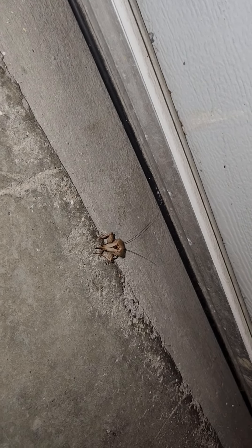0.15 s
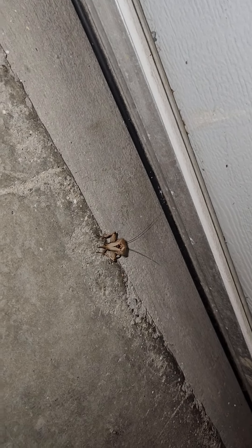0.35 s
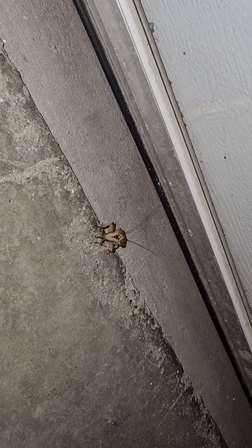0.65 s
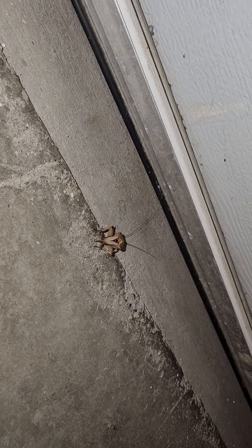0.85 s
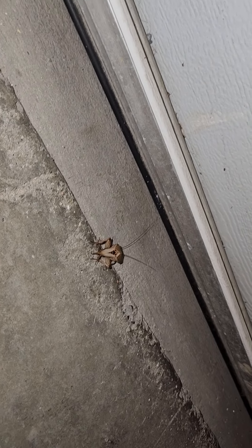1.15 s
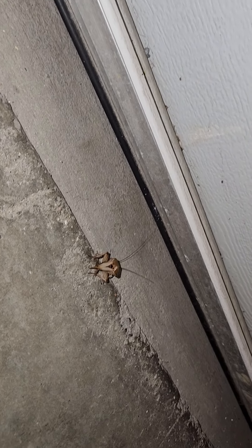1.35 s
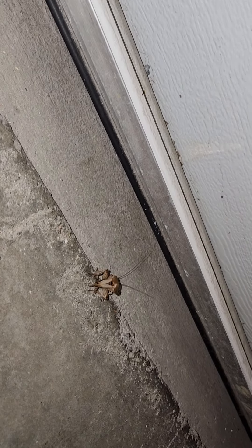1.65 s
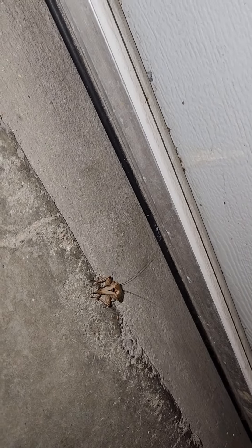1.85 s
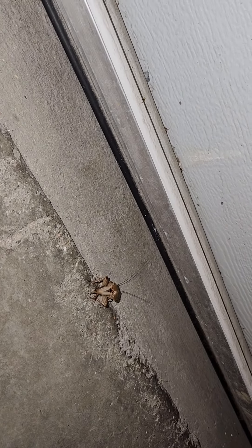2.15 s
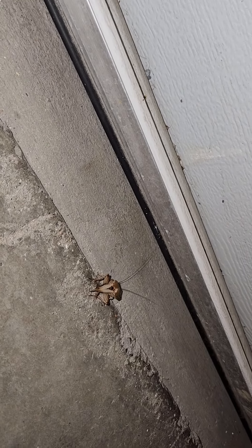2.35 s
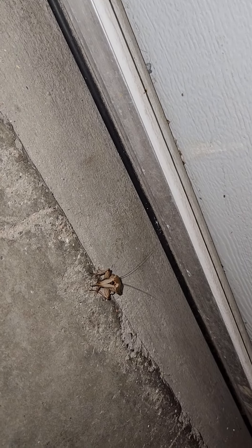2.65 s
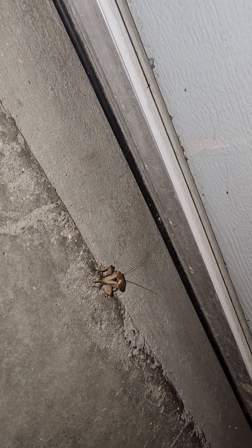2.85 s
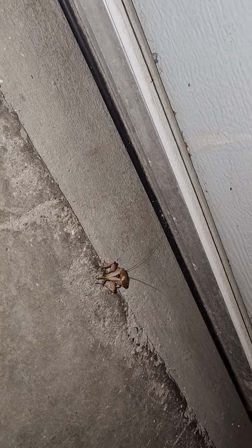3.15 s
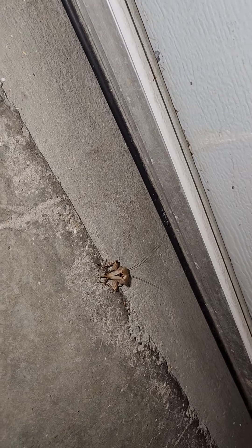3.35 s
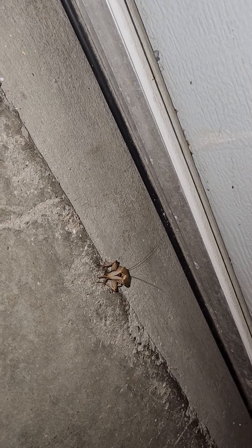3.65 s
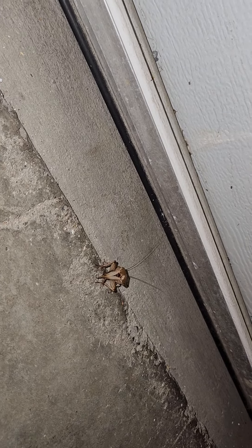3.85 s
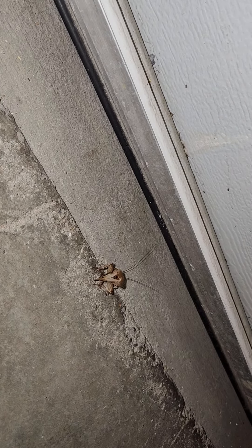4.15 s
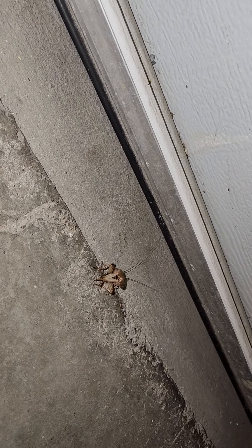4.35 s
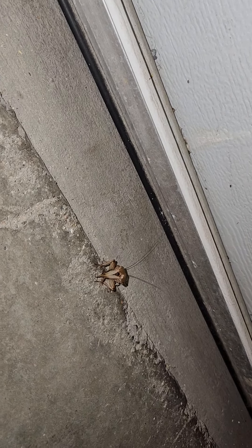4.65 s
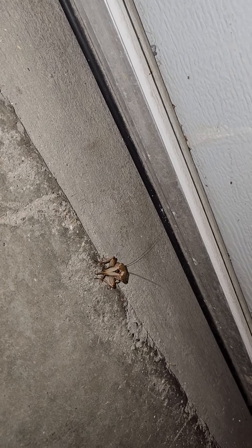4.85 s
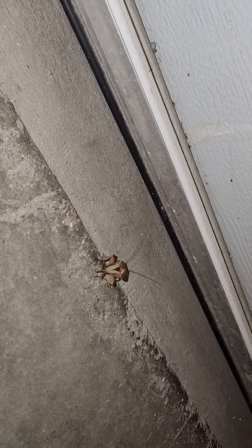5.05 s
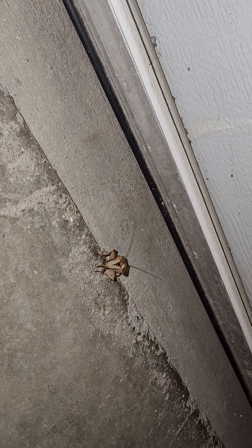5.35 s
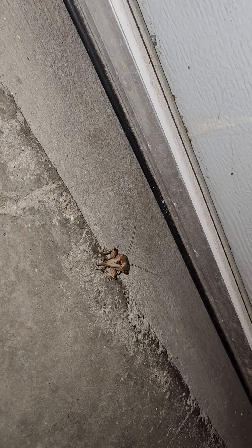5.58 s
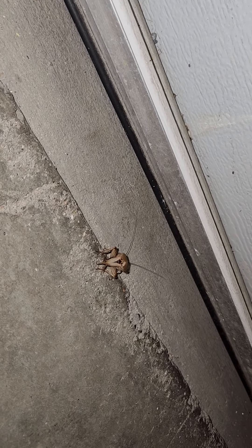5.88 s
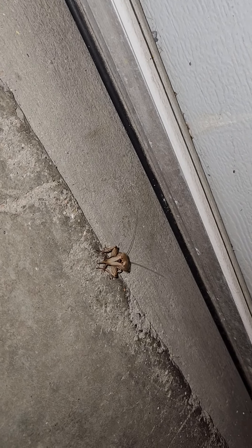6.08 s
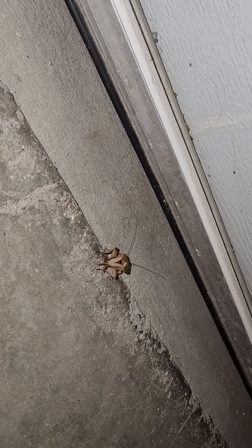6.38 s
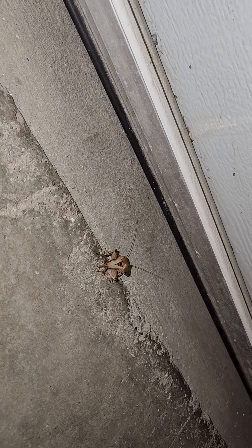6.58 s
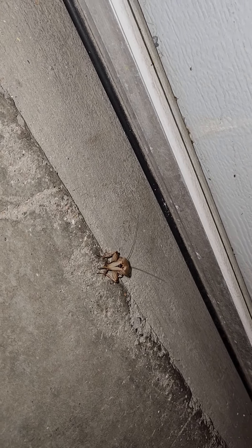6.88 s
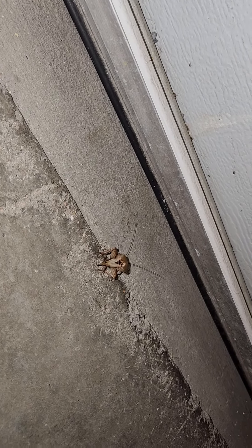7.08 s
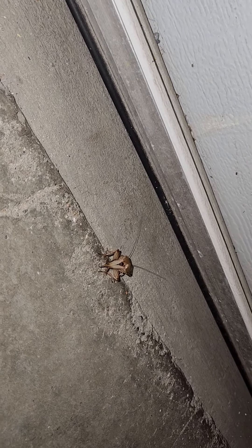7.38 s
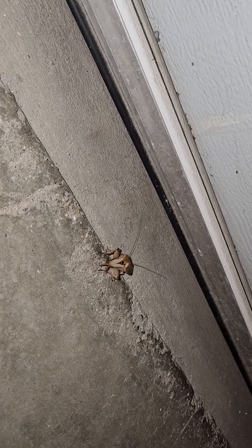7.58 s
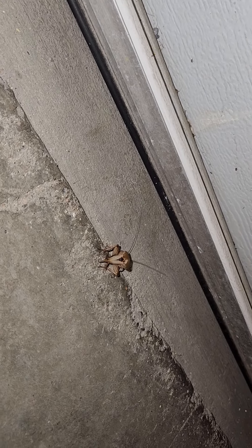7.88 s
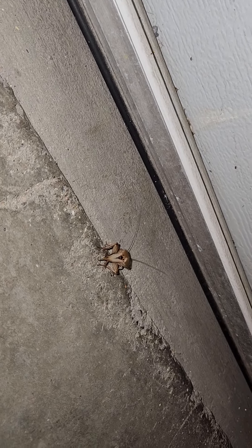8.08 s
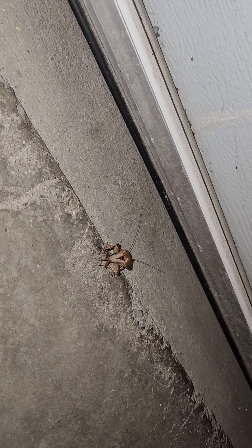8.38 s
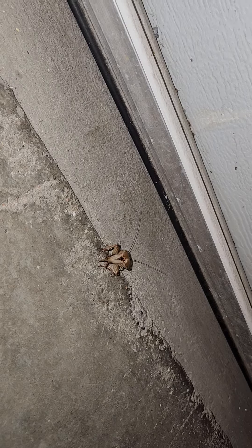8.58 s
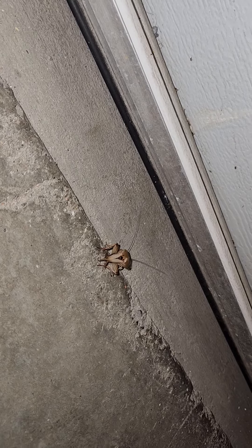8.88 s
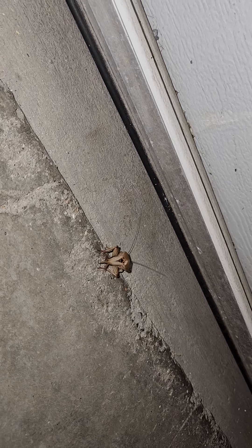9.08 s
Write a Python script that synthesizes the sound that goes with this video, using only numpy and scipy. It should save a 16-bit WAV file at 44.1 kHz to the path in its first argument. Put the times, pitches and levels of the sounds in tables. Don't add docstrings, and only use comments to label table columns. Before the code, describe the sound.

One cricket sings very close to a hand-held stereo microphone in a bare, hard room. Short, piercing, high chirps, each a rapid trill of a few wing strokes, repeat about five times a second. A slightly longer gap comes after two seconds, then the steady rhythm resumes to the end. Each chirp leaves a brief bright ring, over very quiet gusting ventilation rumble and faint hums.

```python
import sys
import numpy as np
from scipy import signal
from scipy.fft import rfft, irfft, next_fast_len
from scipy.io import wavfile
from scipy.ndimage import uniform_filter1d

SR = 44100
rng = np.random.default_rng(int(sys.argv[2]) if len(sys.argv) > 2 else 0)


def voltage_ratio(level):
    return 10 ** (np.asarray(level, float) / 20)


def unload_wav(signal):
    wavfile.write(
        sys.argv[1],
        SR,
        np.round(np.clip(np.atleast_2d(signal).T, -1, 1) * 32767).astype(np.int16),
    )


N = 407043

LEAD_IN = 8820
FRAME = 1024


def at_hz(points, hz):
    table_hz, value = np.array(points)[:, :2].T
    return np.interp(np.log(hz + 1), np.log(table_hz), value)


def in_time(rows, t):
    s, *columns = np.transpose(rows)
    return [np.interp(t, s, column) for column in columns]


def rms_one(x):
    return x / np.sqrt(np.mean(x ** 2) + 1e-20)


def resonance(x, hz, width_hz):
    r = np.exp(-np.pi * width_hz / SR)
    feedback = [1, -2 * r * np.cos(2 * np.pi * hz / SR), r * r]
    return signal.lfilter([(1 - r * r) / 2, 0, (r * r - 1) / 2], feedback, x)


def stereo_noise(spectrum):
    # f/Hz, correlation
    likeness = [(60, 0.99), (180, 0.98), (550, 0.32), (1650, -0.83), (4970, -0.36), (15000, 0.03)]
    # f/Hz, level/dB
    balance = [(60, -0.3), (380, 3), (700, -0.5), (1300, -3.5), (2400, 3)]
    size = next_fast_len(N)
    hz = np.fft.rfftfreq(size, 1 / SR)
    mid, side = rfft(rng.standard_normal((2, size))) * voltage_ratio(at_hz(spectrum, hz))
    alike = np.clip(at_hz(likeness, hz), 0, 1)
    pair = np.sqrt(1 + alike) * mid + np.sqrt(1 - alike) * side * [[1], [-1]]
    tilt = voltage_ratio(at_hz(balance, hz) / 2 * [[1], [-1]])
    return rms_one(irfft(pair * tilt, size)[:, :N])


def ventilation():
    # t/s, level/dB
    gusts = [(0.0, -48), (0.28, -44.5), (1.0, -49), (1.16, -43.5), (1.44, -48), (1.82, -38), (2.88, -45.5),
             (3.01, -41.5), (3.65, -52), (3.67, -43), (5.14, -49.5), (5.4, -40.5), (6.71, -47.5),
             (6.81, -40), (7.22, -47), (7.48, -43.5), (8.87, -49.5), (9.23, -39)]
    # f/Hz, density/dB per Hz
    lows = [(12, -48), (20, -10), (32, -14.5), (81, 1.5), (103, 3.5), (160, -18.5), (210, -59), (350, -120)]
    # f/Hz, density/dB per Hz
    air = [(76, -22), (130, 0.5), (194, -8), (282, -8.5), (325, -9), (638, -20), (1100, -29.5), (1490, -27),
           (2160, -44.5), (3320, -44), (4000, -59), (5200, -60.5), (8800, -120)]
    # f/Hz, width/Hz, level/dB
    hums = [(90.06, 6.8, -55), (214.5, 7.2, -64), (271, 8.3, -54.5), (288.1, 7.8, -56.5), (359.5, 5.9, -61),
            (473, 12.5, -72), (624, 5.2, -82), (1480, 6.6, -76), (1960, 34, -86.5), (3590, 8.9, -83)]
    t = np.arange(N) / SR
    rumble = voltage_ratio(in_time(gusts, t)[0]) * stereo_noise(lows)
    out = rumble + voltage_ratio(-49.5) * stereo_noise(air)
    for hz, width_hz, level_db in hums:
        wobble = rms_one(resonance(resonance(rng.standard_normal(N), hz, width_hz), hz, width_hz))
        steady = 2.5 * np.sin(2 * np.pi * hz * t) * (hz > 1000) * (width_hz < 30)
        out = out + voltage_ratio(level_db) * rms_one(wobble + steady)
    return out


def squeak():
    # t/s, f/Hz, level/dB
    glide = [
        (1.08, 1860, -85),
        (1.13, 1846, -65),
        (1.27, 1740, -65),
        (1.3, 1893, -65),
        (1.38, 1790, -66),
        (1.45, 1800, -90),
    ]
    hz, level_db = in_time(glide, np.arange(N) / SR)
    grain = 1 + .7 * rms_one(uniform_filter1d(rng.standard_normal((2, N)), size=250))
    tone = np.sin(2 * np.pi * np.cumsum(hz) / SR)
    return voltage_ratio(level_db) * grain * tone * (level_db > -89)


def room(x):
    # delay/ms, level/dB
    echoes = [(8.5, -14), (16, -33.5), (27, -27.5)]
    # f/Hz, t60/s, level/dB
    decay = [(1000, 0.5, 3.5), (5400, 0.95, -0.5), (7700, 0.99, -11), (10760, 0.22, 7.5), (16000, 0.3, 9.5)]
    # f/Hz, width/Hz, t60/s, level/dB
    door_frame = (10480, 290, 0.63, 4.3)
    # f/Hz, width/Hz, level/dB
    favoured = (6270, 680, 0.55)
    t = np.arange(SR) / SR
    edges = np.geomspace(700, 18000, num=10)
    hz, t60, level_db = np.transpose(decay)
    tail = 0
    for low, high in zip(edges, edges[1:]):
        band_pass = signal.butter(2, [low, high], "band", fs=SR, output="sos")
        band = signal.sosfilt(band_pass, rng.standard_normal((2, SR)))
        centre = np.sqrt(low * high)
        fade_db = np.interp(centre, hz, level_db) - 60 * t / np.interp(centre, hz, t60)
        tail = tail + band * voltage_ratio(fade_db)
    frame_hz, frame_width_hz, frame_t60, frame_db = door_frame
    ringing = resonance(rng.standard_normal((2, SR)), frame_hz, frame_width_hz)
    tail = tail + ringing * voltage_ratio(frame_db - 60 * t / frame_t60)
    colour_hz, colour_width_hz, colour_db = favoured
    tail = tail + voltage_ratio(colour_db) * resonance(tail, colour_hz, colour_width_hz)
    build_up = np.clip(t / 0.0039, 0, 1)
    tail = voltage_ratio(-14.5) * rms_one(tail * build_up) / np.sqrt(SR)
    for ms, echo_db in echoes:
        delay = round(ms * SR / 1000)
        tail[[0, 1], [delay + 5, delay]] += voltage_ratio(echo_db)
    return signal.fftconvolve(x, tail, axes=1)[:, :x.shape[1]]


def scrape(length_ms, treble_db, t):
    # f/Hz, density/dB per Hz
    scrape_colour = [(900, -21), (2200, -24), (3600, -19), (4600, 3.5), (5900, 5.5), (7400, 3), (8300, -4),
                     (9400, -15.5), (10600, -6.5), (13000, -13), (15600, -6), (17000, -28)]
    hz = np.fft.rfftfreq(FRAME, 1 / SR)
    patches = rms_one(uniform_filter1d(rng.standard_normal((len(length_ms), len(hz))), size=30))
    colour = voltage_ratio(at_hz(scrape_colour, hz) + 2.5 * patches + treble_db * (hz > 9500))
    noise = rfft(rng.standard_normal((3, len(length_ms), FRAME)))
    shared, left, right = rms_one(irfft(noise * colour, FRAME))
    rise = np.clip((t + .0025) / .0035, 0, 1) ** 1.3
    rub = rise * np.exp(-np.maximum(t - 1e-3 * length_ms, 0) / .0028)
    mics_differ = .6
    return rub * (shared + mics_differ * left), rub * (shared + mics_differ * right)


def wing_tone(length_ms, rough, t):
    # multiple of the wing pitch, level/dB
    overtones = [(2, -40), (3, -32.5)]
    wing_hz, wing_width_hz = 5232, 480
    spread_hz, glide_hz, regrip_drop_hz = 25, 267, 137
    chance = rng.standard_normal((len(rough), 5))
    closing = np.clip((t + 0.0011) / (0.00093 * length_ms + 0.00016), 0, 1)
    push = np.sin(np.pi * closing ** (1 - 0.047 * rough)) ** 0.28
    tooth_hz = wing_hz + spread_hz * chance[:, :1] + glide_hz * (.12 - closing ** 3.1)
    waver = 0.69 * rough * signal.lfilter([.03], [1, -.97], rng.standard_normal(closing.shape))
    phase = 2 * np.pi * np.cumsum(tooth_hz, axis=1) / SR + waver + 9 * chance[:, 3:4]
    late = np.clip((t - 1e-3 * length_ms * (1.04 + 0.072 * chance[:, 2:3])) / 0.0029, 0, 1)
    regrip = rough * voltage_ratio(-10 + 3.0 * chance[:, 4:]) * np.sin(np.pi * late ** .7) ** 2
    regrip_phase = 2 * np.pi * (wing_hz - regrip_drop_hz) * t + waver + 9 * chance[:, 1:2]
    drive = push * np.sin(phase) + regrip * np.sin(regrip_phase)
    tone = resonance(resonance(drive, wing_hz, wing_width_hz), wing_hz, 1650)
    tone = tone / np.abs(tone).max(axis=1, keepdims=True)
    for multiple, level_db in overtones:
        level = voltage_ratio(level_db + 2.8 * rng.standard_normal(rough.shape))
        tone = tone + level * push ** 3.2 * np.sin(multiple * phase)
    return tone


def chirp(start, span_ms, level_db, swell_db, false_db):
    # time ahead/s, peak/dB, length/ms
    setting = (0.014, -41.5, 2.7)
    # time ahead/ms, length when faint/ms, length when it catches/ms
    false_start = (7.6, 1.7, 3.1)
    stroke_ms = 11
    slowing, timing_ms = .06, .35
    swell_strokes = 2.8
    opening_ms, later_ms, length_spread = 6.07, 3.9, 0.23
    short_is_loud_db, peak_spread_db = 0.61, 1.62
    loudest_db = -2.8
    chance = rng.standard_normal((3, 6))
    k = np.arange(round(span_ms / stroke_ms) + 1)
    short, loud, late = (chance[:, k] - chance[:, k[1:]].mean(axis=1, keepdims=True)) * (k > 0)
    swell = 1 - np.exp(-k / swell_strokes)
    place = k * (1 + slowing * k / 2)
    s = start + 1e-3 * (span_ms * place / place[-1] + timing_ms * late * (k < k[-1]))
    peak_db = level_db + swell_db * swell / swell[1:].mean()
    peak_db = peak_db + short_is_loud_db * short + peak_spread_db * loud
    peak_db = np.minimum(peak_db, loudest_db)
    length_ms = np.where(k > 0, later_ms * np.exp(-length_spread * short), opening_ms)
    strokes = np.transpose([s, peak_db, length_ms, np.where(k > 0, 1, .15)])
    ahead, tick_db, tick_ms = setting
    tick = (start - ahead, tick_db, tick_ms, 1)
    ahead_ms, faint_ms, caught_ms = false_start
    false_length_ms, false_rough = (caught_ms, .15) if false_db > -15 else (faint_ms, 1)
    failed = (start - ahead_ms / 1000, false_db, false_length_ms, false_rough)
    return np.vstack([tick, failed, strokes])


def cricket():
    # t/s, left lead/us, left minus right/dB, scrape treble above 9.5 kHz/dB
    bearing = [(.2, 71, -4.4, 3.5), (.75, 85, -4.4, 4.5), (1.26, 66, -3.6, 4), (2.1, 33, -3.5, 5),
               (2.7, 40, -3.5, 1), (3.7, 55, -3.7, 1.5), (4.4, 49, -3.6, 1.5), (6.1, 60, -3.8, .3),
               (6.9, 56, -4, .5), (8, 60, -4.2, 1.5), (9.2, 60, -4, 2)]
    # t/s, peak/dB
    rubs = [(2.442, -43), (2.451, -46), (2.758, -40), (3.970, -49), (7.724, -56), (8.150, -42),
            (8.761, -36)]
    # start t/s, first to last stroke/ms, opening stroke peak/dB,
    # later strokes louder by/dB, false start peak/dB
    early_chirps = [(-.075, 44, -5.5, 1, -32), (.1944, 43.5, -6.5, 1.8, -27.5), (.4024, 44, -6.9, 2, -28),
                    (.6389, 44, -7.5, 2.3, -22), (.8517, 43.7, -7, 1.5, -54), (1.057, 43.2, -7.5, 1.2, -28),
                    (1.2583, 44.5, -7, 1.5, -19), (1.4589, 43.9, -6, 1, -20), (1.653, 43.8, -7.5, 2.5, -22),
                    (1.8681, 44.7, -7, 1.5, -41), (2.0977, 43.8, -7.5, 1.5, -42),
                    (2.4656, 34.2, -8, .9, -25.5), (2.7818, 33.4, -7.5, 0, -20.5),
                    (2.9746, 43.4, -7.5, 1, -25), (3.1777, 43.9, -8.5, 2.1, -24),
                    (3.4009, 43.1, -6.5, 1, -47), (3.6021, 43.8, -7, 1.5, -31),
                    (3.7921, 43.7, -6.5, 1.3, -24), (3.9861, 44.1, -7, 0.9, -19),
                    (4.1822, 56.6, -7.9, 2.5, -35), (4.3814, 43.8, -8.1, 2, -27),
                    (4.5823, 44.3, -7.7, 2, -28), (4.7732, 44.8, -7.5, 1, -26)]
    late_chirps = [(4.9685, 43.2, -7.5, 0.3, -34), (5.1602, 44, -7.5, 1.3, -21), (5.344, 44, -7, 1.7, -41),
                   (5.5457, 44.1, -7.5, 2.6, -28), (5.7386, 44.2, -7, 1.5, -39), (5.9354, 43.1, -8, 1, -21),
                   (6.1412, 44, -6.5, 0.8, -29), (6.3468, 44.2, -7.5, 2, -35), (6.5417, 43.9, -7, 1, -23),
                   (6.7327, 44.5, -6.5, 1, -24), (6.9434, 44.2, -7.5, 2, -28.5),
                   (7.1435, 44.2, -7.5, 2.5, -21), (7.3359, 43.4, -6.5, 1.5, -27),
                   (7.5353, 43.9, -7, 1.9, -21), (7.7391, 44.7, -7.5, 1, -9.8),
                   (7.9607, 44.2, -7.5, 1.8, -18), (8.1631, 45.1, -7, 0.5, -9.5),
                   (8.3696, 44.5, -7, 1.5, -23), (8.579, 44, -6.5, 0.4, -48), (8.7734, 43.8, -8, 1.1, -8.9),
                   (8.9652, 44, -6.5, 2, -25), (9.1742, 43.8, -6.5, 0.5, -35)]
    dry_rubs = [(s, level_db, 2.2, 1) for s, level_db in rubs]
    chirps = [chirp(*row) for row in list(early_chirps) + list(late_chirps)]
    rows = np.vstack(chirps + [dry_rubs])
    start, peak_db, length_ms, rough = rows.T[:, :, None]
    strong = peak_db > -15
    strong_scrape_db = -26.5 - 4 + np.where(rough < 1, -7, 0)
    faint_scrape_db = peak_db + np.where(peak_db < -34, -1.5, -15)
    scrape_db = np.where(strong, strong_scrape_db, faint_scrape_db)
    onset = 100
    t = (np.arange(FRAME) - onset) / SR
    lead_us, pan_db, treble_db = in_time(bearing, start)
    tone = voltage_ratio(peak_db - 0.79) * wing_tone(length_ms, rough, t)
    rub_left, rub_right = voltage_ratio(scrape_db) * scrape(length_ms, treble_db + np.where(strong, 0, -12), t)
    left = tone * voltage_ratio(pan_db / 2 + 0.4) + rub_left * voltage_ratio(.3 * pan_db)
    right = tone * voltage_ratio(-pan_db / 2) + rub_right
    turn = np.exp(2j * np.pi * np.fft.rfftfreq(FRAME, 1 / SR) * lead_us / 1e6)
    out = np.zeros((2, LEAD_IN + N + FRAME))
    at = np.round(start * SR).astype(int) + LEAD_IN - onset + np.arange(FRAME)
    np.add.at(out[0], at, irfft(rfft(left) * turn, FRAME))
    np.add.at(out[1], at, right)
    return out


def scene():
    song = cricket()
    song_in_room = (song + room(song))[:, LEAD_IN:LEAD_IN + N]
    return song_in_room + ventilation() + squeak()


def band_limit(x):
    return signal.sosfilt(signal.butter(12, 17130, fs=SR, output="sos"), x)


def record(dry):
    size = np.abs(dry)
    rounded = np.sign(dry) * (.7 + .22 * np.tanh((size - .7) / .22))
    mix = np.where(size > .7, rounded, dry)
    mix = signal.sosfilt(signal.ellip(8, .5, 26, 15900, fs=SR, output="sos"), mix)
    mix = signal.sosfilt(signal.cheby2(10, 40, 17200, fs=SR, output="sos"), mix)
    return band_limit(mix)


dry = scene()
out = record(dry)
unload_wav(out)
```